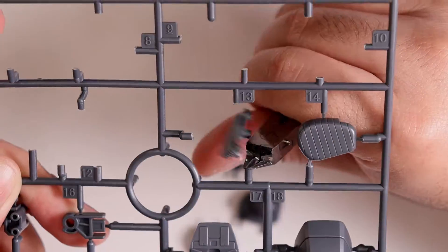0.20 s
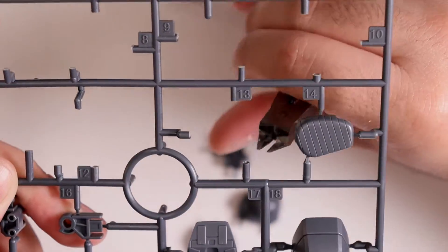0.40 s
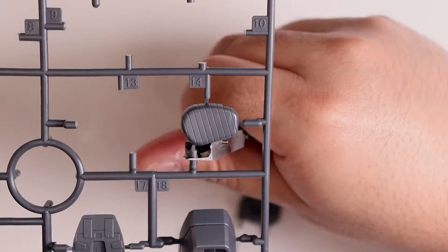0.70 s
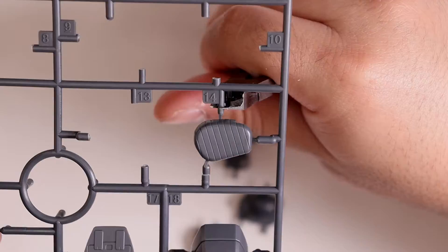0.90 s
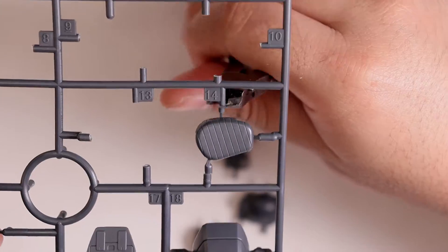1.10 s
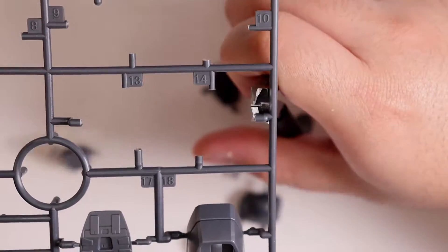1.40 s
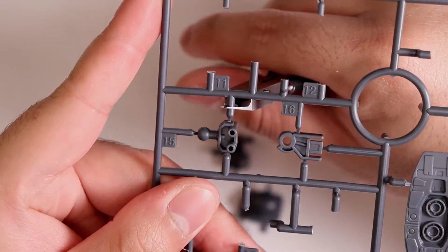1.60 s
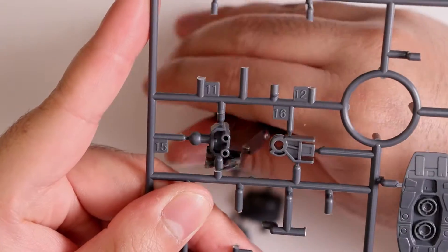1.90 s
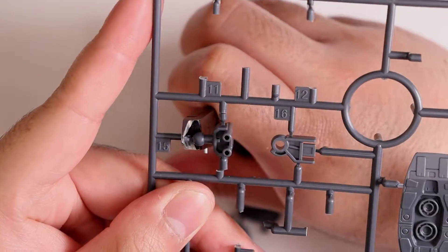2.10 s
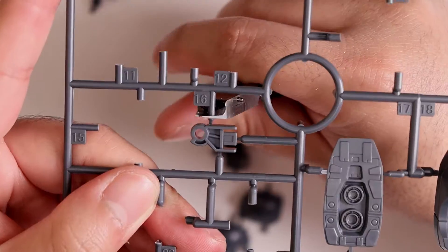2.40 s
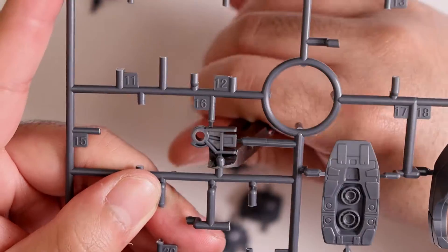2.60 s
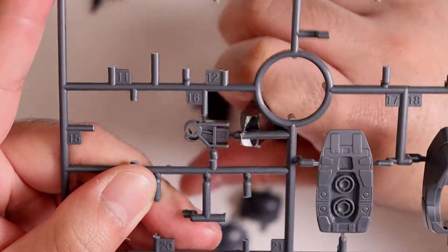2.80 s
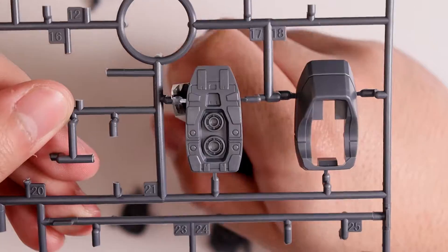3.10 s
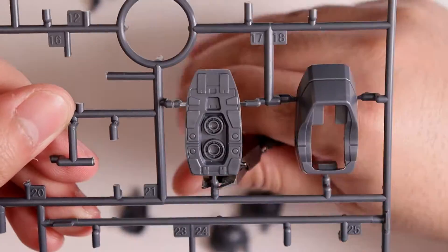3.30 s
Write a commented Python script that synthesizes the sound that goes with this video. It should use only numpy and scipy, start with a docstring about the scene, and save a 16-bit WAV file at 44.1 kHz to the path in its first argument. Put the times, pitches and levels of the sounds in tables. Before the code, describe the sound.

Steel nippers snip hard plastic, close up in a quiet, faintly humming room. A snip's dying tail opens; a bright snap follows at 0.2 s. A part drops and bounces at 0.44-0.62 s. From 0.78 s snaps come about every 0.26 s until 3.17 s, abruptly cut short, some doubled. Parts land at 1.42 and 3.05 s; faint ticks, pivot chirp at 1.97 s, scrape at 2.2 s, soft hand rustle near 3.2 s.

```python
"""A faint room hum and the dying tail of a snip come first, then steel nippers snip plastic parts off a runner.
Freed parts drop and bounce on the desk, steel ticks on plastic, the pivot chirps once and a blade scrapes.
Each knock is a short noise burst sent through ringing resonances, with a low thump and the room's answer.
Knocks and chirp stop short at evenly spaced moments. Chirp: wavering harmonics; scrape and air: shaped noise."""
import sys
import numpy as np
from scipy import signal
from scipy.fft import rfft, irfft, next_fast_len
from scipy.io import wavfile
from scipy.ndimage import uniform_filter1d

SR = 44100
rng = np.random.default_rng(int(sys.argv[2]) if len(sys.argv) > 2 else 0)


def to_wav(sig):
    """Store sig (one row per channel, or 1-D mono) as 16-bit WAV at the path in sys.argv[1].

    Samples outside -1..1 are clipped; the rate is SR.
    """
    pcm = np.clip(np.atleast_2d(sig), -1, 1) * 32767
    pcm = np.round(pcm).astype(np.int16)
    wavfile.write(sys.argv[1], SR, pcm.T)  # frames by channels


def makeup_ratio(level_db):
    """Linear amplitude ratio for a level in decibels (20 dB per factor of ten)."""
    decades = np.asarray(level_db, float) / 20
    return 10 ** decades


N = 152145  # length of the scene [samples]
SPAN = 16384  # longest a single knock or chirp can last [samples]


def unit(x):
    """Scales a sound to rms 1."""
    return x / np.sqrt(np.mean(x ** 2) + 1e-20)


def along(points, hz):
    """Reads a curve of (frequency [Hz], value) points on a log frequency axis."""
    f, v = np.transpose(points)
    return np.interp(np.log(hz + 1), np.log(f + 1), v)


def peak(f, hz, width):
    """One resonance: it passes a band around hz and rings on afterwards, longer if narrow."""
    return 1j * f * width / (hz * hz - f * f + 1j * f * width)


def causal(db):
    """Turns a gain curve in dB into a filter that reacts as early as possible (minimum phase)."""
    cepstrum = irfft(np.log(makeup_ratio(db) + 1e-6))
    half = len(cepstrum) // 2
    cepstrum[1:half] *= 2
    cepstrum[half + 1:] = 0
    return np.exp(rfft(cepstrum))


def noise(response):
    """Steady random noise of rms 1, coloured by the given response."""
    m = next_fast_len(N)
    spectrum = rfft(rng.standard_normal(m)) * response(np.fft.rfftfreq(m, 1 / SR))
    return unit(irfft(spectrum, m)[:N])


# tone of the room air: (frequency [Hz], relative level [dB])
AIR_TONE = [(15, -42.5), (25, -26), (117, -5), (357, -9), (1030, -10), (1150, -10.5), (1390, -14.5),
            (2030, -18), (6340, -24), (7070, -27), (11800, -27), (12800, -28), (16400, -29.5)]
AIR_DB = -75  # rms
# hum: (frequency [Hz], rms level [dB])
HUM_TONES = [(150, -80), (300, -83.5)]
HUM_WAVER = .4  # rms of the narrow noise mixed with each sine of amplitude 1
# low rustle of the hands: (time [s], level before a 1 dB trim [dB])
HAND_RUSTLE = [(0.0, -91.5), (0.38, -73.5), (1.34, -82), (1.82, -76), (2.17, -80), (3.02, -76.5),
               (3.22, -64.5), (3.45, -76.5)]
RUSTLE_HZ, RUSTLE_WIDTH_HZ = 390, 140  # the resonance is applied twice


def background():
    """Room air is shaped noise, the hum is unsteady sines, the rustle is noise in a low band."""
    t = np.arange(N) / SR
    air = makeup_ratio(AIR_DB) * noise(lambda f: makeup_ratio(along(AIR_TONE, f)))
    hum = np.zeros(N)
    for hz, level in HUM_TONES:
        waver = HUM_WAVER * noise(lambda f: peak(f, hz, 15))
        hum += makeup_ratio(level) * unit(np.sin(2 * np.pi * hz * t) + waver)
    s, db = np.transpose(HAND_RUSTLE)
    rustle = makeup_ratio(np.interp(t, s, db) - 1) * noise(lambda f: peak(f, RUSTLE_HZ, RUSTLE_WIDTH_HZ) ** 2)
    return air + hum + rustle


# how long the early room sound takes to fall by 60 dB: (frequency [Hz], time [s])
ROOM_FALL = [(300, .25), (1500, 0.15), (2800, .2), (4000, .16), (7000, 0.16), (11000, .18), (16000, 0.12)]
# tone of the room's answer: (frequency [Hz], relative level [dB])
ROOM_COLOUR = [(200, -2.5), (1000, 11), (2800, 0.5), (4500, 0.5), (7000, 2), (9000, -0.5), (11000, -4),
               (15600, 2), (16300, -20.5)]
ROOM_DELAY_S = 0.0023  # time scale of the soft start
LATE_DB, LATE_LONGER = -21, 3.32  # start level of the late tail, and how many times longer it falls


def room(x):
    """Near walls answer first, then a weaker and longer tail: noise that fades at each pitch's own pace."""
    hz, t, z = signal.stft(rng.standard_normal(SPAN), SR, nperseg=256)
    fall = -60 * t / along(ROOM_FALL, hz)[:, None]
    z = z * (makeup_ratio(fall) + makeup_ratio(LATE_DB + fall / LATE_LONGER))
    z = z * makeup_ratio(along(ROOM_COLOUR, hz))[:, None]
    tail = signal.istft(z, SR, nperseg=256)[1][:SPAN]
    tail = tail * (1 - np.exp(-(np.arange(SPAN) / SR / ROOM_DELAY_S) ** 2))
    return signal.fftconvolve(x, tail / np.linalg.norm(tail))[:SPAN]


FIRST_STOP_S, STOP_EVERY_S, FADE_S = .1205, .2667, .002  # when sounds stop short, and the fade into a stop


def add(out, s, x):
    """Lays a sound in at s seconds; the next stop ends it."""
    stop = FIRST_STOP_S + STOP_EVERY_S * np.ceil((s - FIRST_STOP_S) / STOP_EVERY_S)
    at = round(s * SR) + np.arange(len(x))
    keep = (at >= 0) & (at < N)
    fade = np.clip((stop - at / SR) / FADE_S, 0, 1)
    out[at[keep]] += (x * fade)[keep]


CRACK_S, CRACK_DB = .0006, 6  # first break: its delay (also the burst's rise time), and its level


def burst(t60, again_s, again_db):
    """A sharp crack, fading noise and a weaker rebound, evened out so that no pitch stands out."""
    t = np.arange(SPAN) / SR
    later = t - again_s * rng.uniform(.8, 1.2)
    shape = makeup_ratio(-60 * t / t60) * (1 - np.exp(-t / CRACK_S))
    shape = shape + (later > 0) * makeup_ratio(again_db - 60 * np.abs(later) / t60)
    crack = makeup_ratio(CRACK_DB) * (np.arange(SPAN) == round(CRACK_S * SR))
    spectrum = rfft(shape * rng.standard_normal(SPAN) + crack)
    even = np.sqrt(np.abs(uniform_filter1d(np.abs(spectrum) ** 2, size=400)) + 1e-9)
    return spectrum / even


# tone of the desk's shudder: (frequency [Hz], relative level [dB])
SHUDDER_TONE = [(20, -26.5), (40, -5.5), (100, 7.5), (160, 3), (300, -25), (600, -54.5)]
SHUDDER_RISE_S, SHUDDER_T60 = 0.0095, 0.24  # rise time scale [s], time to fall by 60 dB [s]


def shudder(db):
    """The desk trembles: low noise that swells and then dies away."""
    t, f = np.arange(SPAN) / SR, np.fft.rfftfreq(SPAN, 1 / SR)
    low = unit(irfft(rfft(rng.standard_normal(SPAN)) * makeup_ratio(along(SHUDDER_TONE, f))))
    return low * makeup_ratio(db - 60 * t / SHUDDER_T60) * (1 - np.exp(-t / SHUDDER_RISE_S))


BODY_HZ, AIR_HZ = 3500, 10000  # a knock's body lies below the first, its air above the second


def hits(rows, tone, blow, kind, shudder_db=-120):
    """A burst excites a coloured body with two rings; a low thump, the room and the desk join in."""
    width, ring_db, second_hz, second_width, second_db, low_hz, low_width, low_db, room_db = kind
    out, f = np.zeros(N), np.fft.rfftfreq(SPAN, 1 / SR)
    for s, db, hz, body_db, air_db, thump_db in rows:
        colour = along(tone, f) + body_db / (1 + (f / BODY_HZ) ** 6)
        colour = colour + air_db / (1 + (AIR_HZ / (f + 1)) ** 6)
        rings = makeup_ratio(ring_db) * peak(f, hz, width) + makeup_ratio(second_db) * peak(f, second_hz, second_width)
        body = causal(colour) * (1 + rings)
        # brings bodies of any colour to a similar loudness
        scale = np.sqrt(1.5 * np.max(uniform_filter1d(irfft(body) ** 2, size=120)))
        knock = irfft(burst(*blow) * body) / scale
        # the thump comes 1 ms late
        thump = irfft(peak(f, low_hz, low_width) * np.exp(-2j * np.pi * f * .001))
        thump = makeup_ratio(low_db + thump_db) * thump / thump.max()
        answer = makeup_ratio(room_db) * room(irfft(body) / scale + thump)
        add(out, s, makeup_ratio(db) * (knock + thump + answer + shudder(shudder_db + thump_db)))
    return out


# snips; body, air and thump are relative:
# (time [s], level [dB], ring [Hz], body [dB], air [dB], thump [dB])
SNIP_HITS = [(0.2127, -14.5, 7775, 3, -5, -2), (0.7801, -12.5, 6880, 3, 11.5, 5),
             (1.0283, -15, 7270, 4, 7, 1), (1.3007, -17.5, 8130, 6, 5, 3.5),
             (1.312, -17, 7260, 8.5, 15.5, 0), (1.5718, -11, 6950, -8.5, -3, 3.5),
             (1.8143, -12.5, 6940, 4.5, 3, 5.5), (2.0856, -23.5, 7500, 12, 6, -18),
             (2.3486, -11, 7330, -2, 1, 5.5), (2.641, -10.5, 7540, -4, -5.5, 1.5),
             (2.8836, -15.5, 6840, 1, -3, -6), (2.8931, -24.5, 7500, 0.5, 5.5, -4.5),
             (3.1706, -14.5, 7190, -1, -0.5, 3)]
# a snip before the start, only its tail still sounds: (level [dB], ring [Hz], body [dB], air [dB], thump [dB])
FIRST_TAIL = (-12.5, 7204, 7, 1, -22)
EARLIER_S = -.09
# tone of a snip: (frequency [Hz], relative level [dB])
SNIP_TONE = [(350, -45.5), (600, -27), (992, -29), (3390, -11), (4810, -13), (5930, -8), (7210, 0.5),
             (8520, -7.5), (10700, -12), (14500, -10), (15800, -17.5), (16900, -33.5)]
# resonances of a snip: (ring width [Hz], ring [dB], second ring [Hz], its width [Hz], its level [dB],
# thump [Hz], thump width [Hz], thump [dB], room [dB])
SNIP_RESONANCES = (254, 2, 2799, 93, 0, 381.5, 118, -26, -13.5)
SNIP_BURST = (.009, .003, -15)  # (time to fall by 60 dB [s], mean rebound delay [s], rebound [dB])


def snips():
    """Blades break through plastic: a bright ringing snap, and the desk shudders after it."""
    rows = [(EARLIER_S, *FIRST_TAIL)] + list(SNIP_HITS)
    return hits(rows, SNIP_TONE, SNIP_BURST, SNIP_RESONANCES, shudder_db=-53)


# tone of the hiss: (frequency [Hz], relative level [dB])
LEAD_TONE = [(880, -33.5), (1500, 0), (1970, 1), (4290, -4), (7900, 1.5), (15100, -12.5), (16400, -22.5)]
LEAD_S, LEAD_DB, LEAD_RISE_DB = .029, -68, 3  # length, rms at its end, growth up to there
ALSO_LED_S = [.438, 3.465]  # other moments the hiss leads up to


def lead():
    """A faint hiss, made of shaped noise, that grows up to each snip and two more moments."""
    moments = np.array([row[0] for row in SNIP_HITS] + ALSO_LED_S)[:, None]
    ahead = (moments - np.arange(N) / SR) / LEAD_S
    growth = makeup_ratio(LEAD_DB - LEAD_RISE_DB * np.clip(ahead, 0, 1))
    level = np.max((ahead > 0) * (ahead < 1) * growth, axis=0)
    return level * noise(lambda f: makeup_ratio(along(LEAD_TONE, f)))


# light ticks of steel on plastic: (time [s], level [dB], ring [Hz])
TICK_HITS = [(0.2613, -34.5, 8200), (.466, -33.5, 6573), (0.564, -39, 6500), (.636, -51, 6770),
             (1.9583, -48.5, 4170), (1.963, -55, 3900), (1.966, -49.5, 4140), (1.9743, -48, 4090),
             (2.4824, -57.5, 4050), (2.593, -66, 3954), (2.985, -54.5, 6970), (3.036, -48, 4593),
             (3.303, -53.5, 2902), (3.345, -67, 10560)]
# tone of a tick: (frequency [Hz], relative level [dB])
TICK_TONE = [(470, -43), (800, -22), (4000, -5), (8180, -9), (9780, -20), (15100, -9.5), (16900, -48)]
# resonances of a tick: (ring width [Hz], ring [dB], second ring [Hz], its width [Hz], its level [dB],
# thump [Hz], thump width [Hz], thump [dB], room [dB])
TICK_RESONANCES = (251.5, 8, 3602, 297.5, 1, 494.5, 197.5, -48.5, -15)
TICK_BURST = (.007, .003, -14)  # (time to fall by 60 dB [s], mean rebound delay [s], rebound [dB])


def ticks():
    """Steel lightly touches plastic: a very short burst with a strong ring."""
    rows = [(*row, 0, 0, 0) for row in TICK_HITS]
    return hits(rows, TICK_TONE, TICK_BURST, TICK_RESONANCES)


# parts landing on the desk; body, air and thump are relative:
# (time [s], level [dB], ring [Hz], body [dB], air [dB], thump [dB])
DROP_HITS = [(.438, -21.5, 8250, -5, 0.5, 2), (.4418, -8, 6570, -8, -5, -1),
             (.5403, -19, 6730, 3.5, -5.5, 8), (.616, -27, 5870, 6, -3.5, 14),
             (1.422, -15.5, 6080, 5, 7, 13.5), (3.0478, -15.5, 6270, 1.5, 0, -12)]
# tone of a landing part: (frequency [Hz], relative level [dB])
DROP_TONE = [(290, -63.5), (500, -41.5), (755, -28.5), (1910, -9.5), (2720, -13.5), (3990, -10.5),
             (4980, -12.5), (6300, 0), (7740, -3.5), (10100, -11.5), (15700, -17), (16900, -29)]
# resonances of a landing part: (ring width [Hz], ring [dB], second ring [Hz], its width [Hz], its level [dB],
# thump [Hz], thump width [Hz], thump [dB], room [dB])
DROP_RESONANCES = (501, -2.5, 1945.5, 299.5, -5.5, 499.5, 250, -35.5, -11.5)
DROP_BURST = (.013, .002, -13)  # (time to fall by 60 dB [s], mean rebound delay [s], rebound [dB])


def drops():
    """Freed parts hit the desk and bounce: a longer burst with wide, quickly fading rings."""
    return hits(DROP_HITS, DROP_TONE, DROP_BURST, DROP_RESONANCES)


# harmonics of the chirp: (multiple of its pitch, relative level [dB])
SQUEAK_HARMONICS = [(1, 4), (2, -1.5), (3, -10.5), (4, -12), (5, -18.5)]
SQUEAK_S, SQUEAK_HZ, SQUEAK_DB, SQUEAK_ROOM_DB = 1.971, 3260, -37.5, -14
SQUEAK_RISE_S, SQUEAK_T60 = .0012, .022  # rise time scale [s], time to fall by 60 dB [s]
SQUEAK_ROUGH = .2  # random phase steps before smoothing [rad per sample]


def squeak():
    """A short chirp of the pivot: harmonics share one wandering phase, so the pitch is rough."""
    early = .005  # room for the rise before the loudest moment [s]
    t = np.arange(SPAN) / SR - early
    rise = np.exp(np.minimum(t, 0) / SQUEAK_RISE_S)
    fall = makeup_ratio(-60 * np.maximum(t, 0) / SQUEAK_T60)
    wander = np.cumsum(uniform_filter1d(rng.standard_normal(SPAN), size=30))
    phase = 2 * np.pi * SQUEAK_HZ * t + SQUEAK_ROUGH * wander
    tone = sum(makeup_ratio(level) * np.sin(k * phase) for k, level in SQUEAK_HARMONICS)
    x = makeup_ratio(SQUEAK_DB) * np.where(t < 0, rise, fall) * tone
    out = np.zeros(N)
    add(out, SQUEAK_S - early, x + makeup_ratio(SQUEAK_ROOM_DB) * room(x))
    return out


# the blade slides on the runner: (time [s], level [dB])
SCRAPE_LEVEL = [(2.194, -72.5), (2.198, -46), (2.21, -47.5), (2.227, -43), (2.24, -56.5), (2.253, -66.5)]
# resonances of blade and runner: (frequency [Hz], width [Hz], relative level [dB])
SCRAPE_RINGS = [(2566, 180, -1.5), (5300, 420, -0.5), (7500, 250, -5), (10200, 450, -13),
                (13700, 1000, -21.5)]
SCRAPE_GRIT = .4  # rms depth of the roughness


def scrape():
    """Gritty friction: noise through the resonances of blade and runner, with a rough loudness."""
    def rings(f):
        # neighbours have opposite signs
        return sum((-1) ** k * makeup_ratio(g) * peak(f, c, w) for k, (c, w, g) in enumerate(SCRAPE_RINGS))

    s, db = np.transpose(SCRAPE_LEVEL)
    level = makeup_ratio(np.interp(np.arange(N) / SR, s, db, left=-140, right=-140))
    grit = 1 + SCRAPE_GRIT * unit(uniform_filter1d(rng.standard_normal(N), size=40))
    return level * unit(grit * noise(rings))


def scene():
    """Adds up all sources at one microphone."""
    mix = background() + snips() + lead() + ticks() + drops() + squeak() + scrape()
    return mix[None]


def band_limit(x):
    """A steep low-pass at the top of the band."""
    return signal.sosfilt(signal.butter(12, 17080, fs=SR, output="sos"), x)


def record(dry):
    """Passes on the finished mix as it will be heard."""
    return band_limit(dry)


dry = scene()
out = record(dry)
to_wav(out)
```